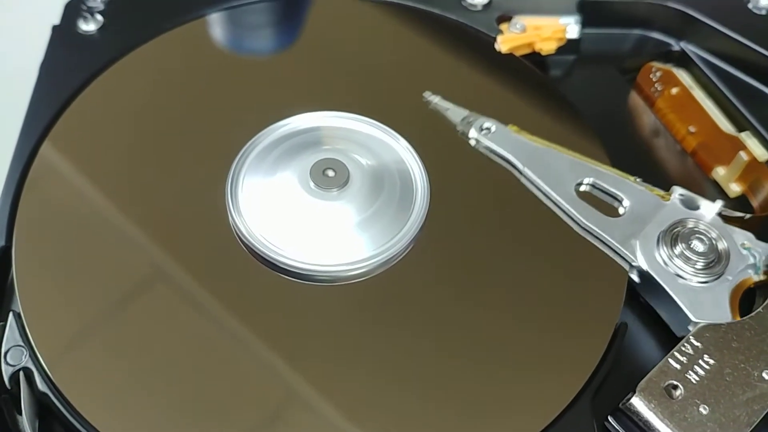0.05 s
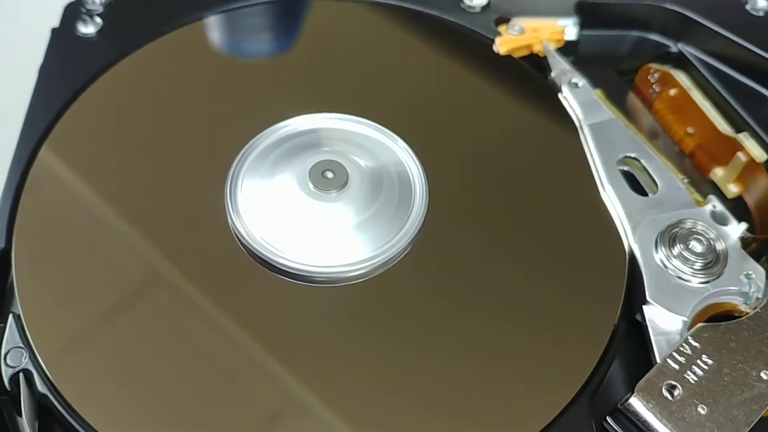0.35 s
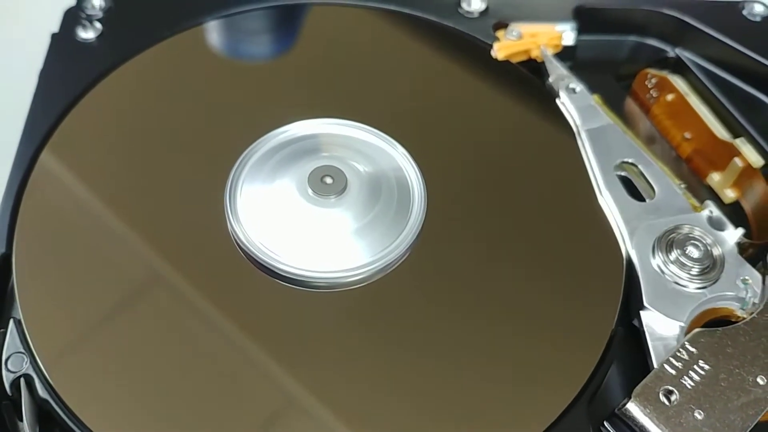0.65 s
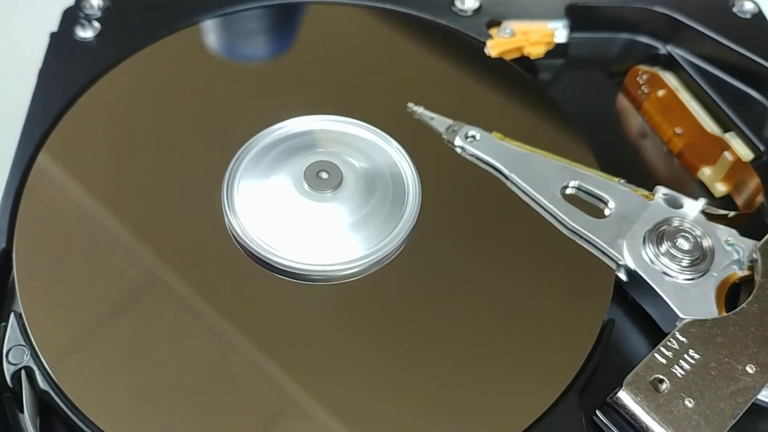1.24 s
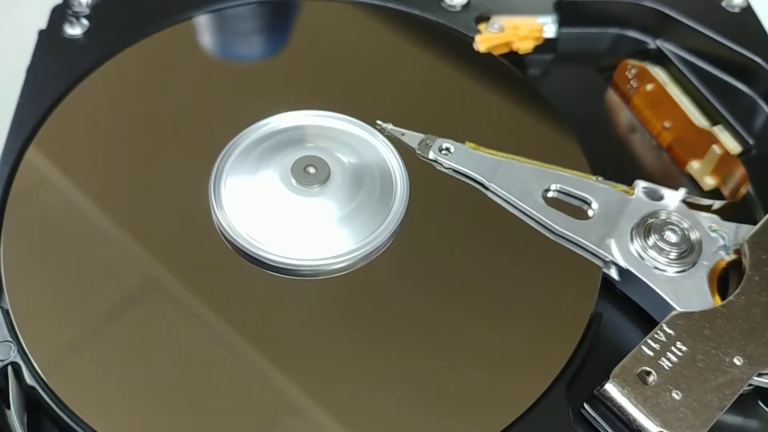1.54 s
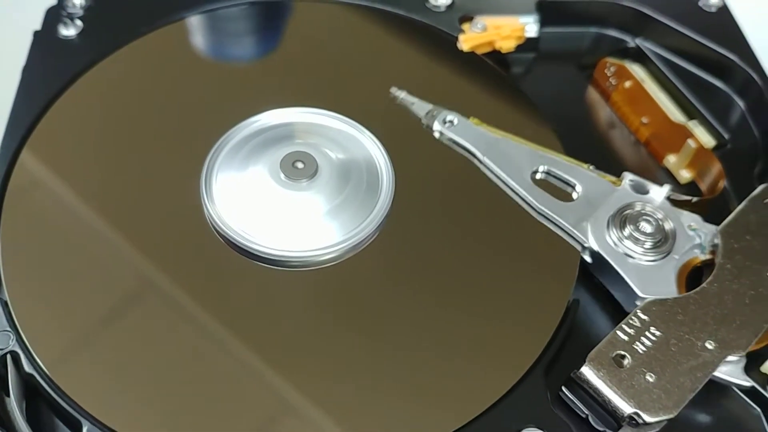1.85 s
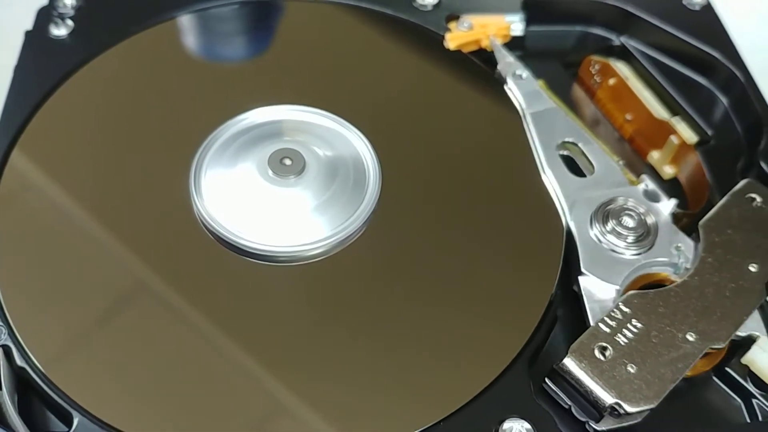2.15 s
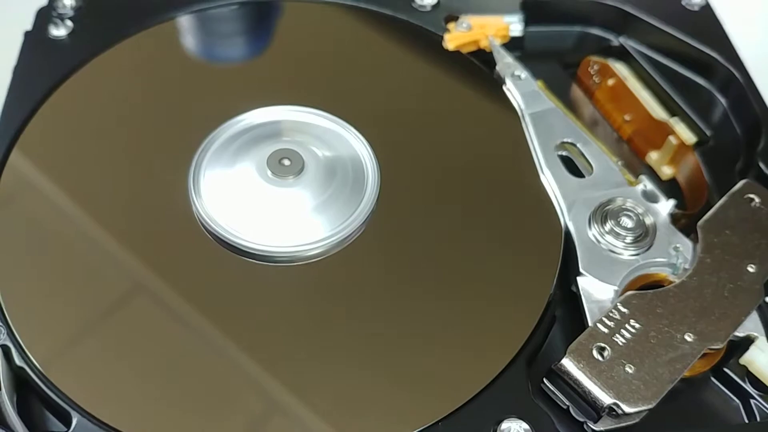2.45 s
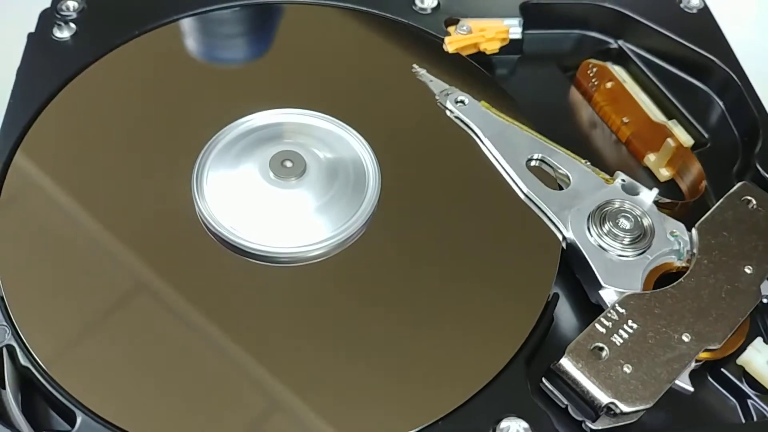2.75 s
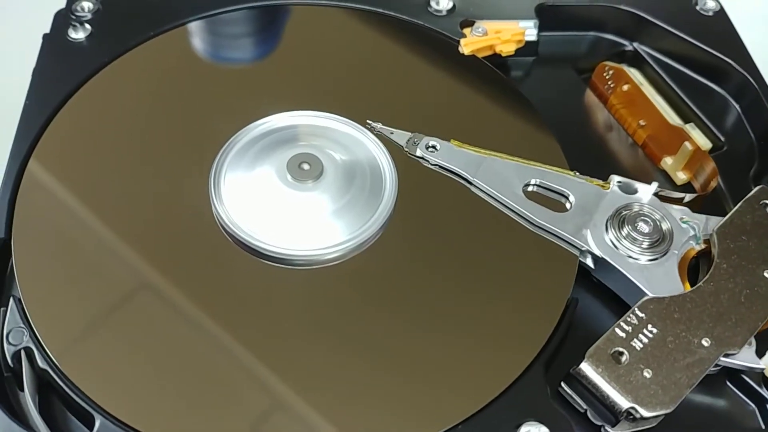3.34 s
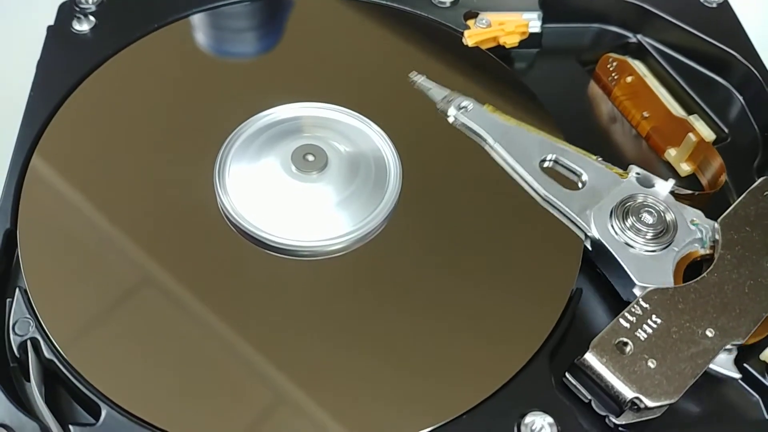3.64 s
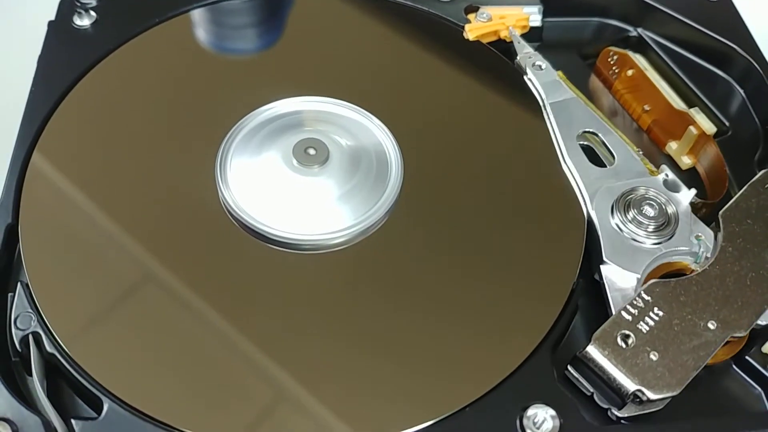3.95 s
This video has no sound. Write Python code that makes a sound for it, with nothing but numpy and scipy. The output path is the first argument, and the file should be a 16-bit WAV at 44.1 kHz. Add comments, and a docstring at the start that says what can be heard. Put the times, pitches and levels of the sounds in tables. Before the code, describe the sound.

A failing hard drive clicks sharply as its arm knocks back and forth in repeating cycles, twice buzzing briefly. Underneath, the spinning disks whirr and hum steadily, very close to the microphone indoors.

```python
"""The clicking arm of a failing hard drive, open on a desk, very close to a stereo pair of microphones.
Hunting for its tracks, the arm clicks three times a cycle: against the inner stop, into the parking
ramp, and off it again. It buzzes while parked, and the heads squeak thinly as they land.
Behind it the casing rumbles, the spindle hums and the air round the platters whirrs,
swelling a little while the arm stands in the air stream."""
import sys
import numpy as np
from scipy import signal
from scipy.fft import rfft, irfft, next_fast_len
from scipy.io import wavfile
from scipy.ndimage import map_coordinates

SR = 44100
rng = np.random.default_rng(int(sys.argv[2]) if len(sys.argv) > 2 else 0)


def master(y):
    """Save y as 16-bit WAV."""
    cut = np.clip(np.atleast_2d(y).T, -1, 1)
    pcm = np.round(cut * 32767)  # scale
    wavfile.write(sys.argv[1], SR, pcm.astype(np.int16))


N = 176400


def amp(db):
    """Decibels to gain."""
    return 10 ** (np.asarray(db) / 20)


def along(points, hz):
    """Each column of a table, read on a log frequency axis."""
    row_hz, *columns = np.transpose(points)
    return np.array([np.interp(np.log(hz + 1), np.log(row_hz + 1), column) for column in columns])


def wobble(knots_per_s):
    """A smooth random curve."""
    knots = rng.standard_normal(int(N * knots_per_s / SR) + 4)
    return map_coordinates(knots, [np.arange(N) * knots_per_s / SR])


def filtered(x, response):
    """Shape x by a response, given as a function of frequency."""
    size = next_fast_len(N + 8192)
    return irfft(rfft(x, size) * response(np.fft.rfftfreq(size, 1 / SR)), size)[..., :N]


def since(start):
    """Seconds since start, zero before."""
    return np.maximum(np.arange(N) / SR - start, 0)


def fall(t, attack_s, t60):
    """A quick rise and an exponential decay."""
    return (1 - np.exp(-t / attack_s)) * amp(-60 * np.minimum(t / t60, 2))


def add(out, start, sound):
    """Mix a short sound in at start seconds."""
    part = out[:, max(round(start * SR), 0):][:, :sound.shape[1]]
    part += sound[:, :part.shape[1]]


def ring(modes, attack_s):
    """One blow; neighbouring modes start opposed, so that close pairs swell and beat."""
    t = np.arange(SR // 4) / SR
    out = np.zeros((2, len(t)))
    for k, (hz, left_db, right_db, t60) in enumerate(modes):
        gain = amp(np.array([[left_db], [right_db]]) + .8 * rng.standard_normal())
        out += (-1) ** k * gain * np.sin(2 * np.pi * hz * t) * fall(t, attack_s, t60)
    return out


# How alike noise is at the two microphones. Each row: frequency in Hz, correlation from 0 to 1.
MIC_LIKENESS = [(100, 1), (300, 1), (600, 0.91), (1500, 0), (3000, 0.44), (7000, 0.29), (14000, 0)]

def stereo_noise(spectrum):
    """Noise of rms 1 with its own colour at each microphone."""
    def mid_side_gains(hz):
        angle = np.arccos(np.clip(along(MIC_LIKENESS, hz)[0], -1, 1)) / 2
        return np.array([np.cos(angle), np.sin(angle)])
    mid, side = filtered(rng.standard_normal((2, N)), mid_side_gains)
    left_right = np.array([mid + side, mid - side])
    return unit(filtered(left_right, lambda hz: amp(along(spectrum, hz))))


def unit(x):
    """Scale to rms 1."""
    return x / np.sqrt(np.mean(x ** 2) + 1e-20)


def room(x):
    """The short answer of the desk and the room around the drive."""
    t = np.arange(SR // 3) / SR
    tail = rng.standard_normal((2, len(t))) * fall(t, attack_s=0.011, t60=0.079)
    return signal.fftconvolve(x, tail / np.linalg.norm(tail[0]), axes=1)[:, :N]


# The casing on the desk. Each row: frequency in Hz, relative level left and right in dB.
RUMBLE_SPECTRUM = [(25, -105, -106), (38, -126, -109), (58.5, -55.5, -50.5), (93, -60, -57),
                   (120, -49, -45), (174.5, -54, -51), (237, -62.5, -59.5), (306, -62, -62),
                   (517, -70.5, -66.5), (940, -114, -118.5)]

def casing_rumble(level_db=-44.5):
    """The casing shakes on the desk: a low rumble whose level wavers."""
    return amp(level_db + 1.15 * wobble(9.03)) * stereo_noise(RUMBLE_SPECTRUM)


def spindle_hum(centre_hz=119.4, width_hz=13.5, level_db=-47, left_db=-1.5):
    """The spindle turns with a rough hum, a little weaker at the left microphone."""
    hum = filtered(rng.standard_normal(N), lambda hz: np.exp(-((hz - centre_hz) / width_hz) ** 2))
    return amp(level_db) * unit(hum) * amp([[left_db], [0]])


# The air round the platters. Each row: frequency in Hz, relative level left and right in dB.
WHIRR_SPECTRUM = [(1010, -86, -82.5), (1225, -102, -77.5), (1264, -74.5, -84), (1710, -131, -73.5),
                  (1912, -69.5, -61.5), (2007, -69, -71), (2405, -71, -101), (2922, -64.5, -64),
                  (3290, -68, -72), (3420, -67, -70.0), (3970, -89.5, -65), (4150, -73, -79.5),
                  (4650, -79, -72), (6260, -83, -76), (6310, -73.5, -69), (6800, -82.5, -71.5),
                  (7560, -86.5, -67), (8100, -85.5, -79.0), (8800, -113.0, -89.5), (9400, -144.0, -102.0),
                  (10600, -136.0, -144.0), (11400, -115.0, -107.0), (14700, -111.0, -96.5),
                  (15700, -118.0, -108.0)]
# The arm stands in the air stream. Each row: start and end in seconds.
ARM_IN_STREAM = [(-.5, 0.32), (.97, 2.07), (2.76, 3.78)]

def air_whirr(level_db=-36, swell_db=1.5, swell_s=0.053):
    """The platters drag air round in a flickering hiss that swells while the arm stands over them."""
    t = since(0)
    in_stream = sum(np.tanh((t - start) / swell_s) - np.tanh((t - end) / swell_s)
                    for start, end in ARM_IN_STREAM) / 2
    flicker_db = 0.92 * wobble(25.44) + 0.18 * wobble(20)
    return amp(level_db + swell_db * in_stream + flicker_db) * stereo_noise(WHIRR_SPECTRUM)


# The heads land on the platter. Each row: time of the peak in seconds, level in dB.
HEAD_LANDINGS = [(.848, -58), (2.635, -64)]

def head_squeaks(centre_hz=14450, width_hz=420, width_s=.03):
    """Narrow, very high friction noise as the heads settle."""
    friction = filtered(rng.standard_normal((2, N)),
                        lambda hz: 1 / (1 + ((hz - centre_hz) / width_hz) ** 2))
    envelope = sum(amp(db) * np.exp(-((since(0) - peak) / width_s) ** 2) for peak, db in HEAD_LANDINGS)
    return unit(friction) * envelope


# The arm's modes. Each row: frequency in Hz, relative level left and right in dB, t60 in seconds.
ARM_MODES = [(1447.6, -5, 4, 0.082), (1550, -2.5, 6.5, 0.075), (2870, -13, -11, 0.05),
             (3462, 2, -17, 0.051), (3570, -1.5, -6, 0.096), (3790, -17, -3.5, 0.041),
             (4510, -5.5, -6.5, 0.043), (5170, -10.5, -12, .03), (6340, -20, -5, 0.049),
             (7450, -27, -19, 0.03)]

def arm_ring(attack_s):
    """The struck arm rings, its close modes beating."""
    return ring(ARM_MODES, attack_s)


# The arm buzzes against the ramp. Each row: start in seconds, length in seconds, tap level in dB.
ARM_BUZZES = [(0.481, 0.069, -41.5), (2.283, 0.066, -44.5)]

def arm_buzzes(step_hz=111.15, scatter_db=3):
    """The parked arm is nudged in small even steps, which keep its modes ringing."""
    out = np.zeros((2, N))
    for start, length, db in ARM_BUZZES:
        tap = arm_ring(attack_s=0.0025)
        tap_levels = db + scatter_db * rng.standard_normal(32)
        for offset, tap_db in zip(np.arange(0, length, 1 / step_hz), tap_levels):
            add(out, start + offset, amp(tap_db) * tap)
    return out


# Modes of the ramp and of the head springs.
# Each row: frequency in Hz, relative level left and right in dB, t60 in seconds.
RAMP_MODES = [(2363, -4, -2.5, 0.063), (3100, -10, -4.5, 0.066), (3414, -2, -6, 0.044),
              (3813, -8, 3, 0.068), (5116, 2, 12.5, 0.047), (5220, -5, -3, 0.027), (7550, -15, -4.5, .035),
              (8020, -19, -3, 0.032)]
SPRING_MODES = [(1240, -7, -4, 0.045), (1540, -9, 2, 0.033), (1840, 8, -4, .06), (2344, 3, -2, 0.071),
                (2810, -3, -5, .03), (3460, 3, 1, 0.061)]
# Contact noise at the ramp. Each row: frequency in Hz, relative level left and right in dB.
RAMP_CRACK_SPECTRUM = [(310, -7, 0.5), (870, -10, -8), (1310, -4, 3.5), (2650, 6.5, 3), (3700, 5, 3.5),
                       (4800, -4, -3), (5350, 7, 6), (6100, -15, 0.5), (7700, -6, 6.5), (10000, -35, -15),
                       (15000, -28.5, -19)]
# The arm meets the ramp, rebounds and later slips off it.
# Each row: start in seconds, then ring, crack and clatter levels in dB.
RAMP_TOUCHES = [(0.3733, -27.5, -25.5, -41), (0.3794, -28, -29.5, -38), (0.801, -38, -39.5, -45),
                (2.1706, -30, -26, -33), (2.1765, -33, -30, -28.5), (2.5765, -39, -41, -47),
                (3.9141, -27.5, -24, -37), (3.92, -30.5, -29, -39)]

def ramp_snaps():
    """Each touch of the parking ramp is a dry snap that rings it and rattles the head springs."""
    out = np.zeros((2, N))
    crack = stereo_noise(RAMP_CRACK_SPECTRUM)
    for start, ring_db, crack_db, clatter_db in RAMP_TOUCHES:
        add(out, start, amp(ring_db) * ring(RAMP_MODES, attack_s=0.00068))
        add(out, start, amp(clatter_db) * ring(SPRING_MODES, attack_s=0.001))
        out += amp(crack_db) * crack * fall(since(start), attack_s=0.00031, t60=0.036)
    return out


# Contact noise of the arm. Each row: frequency in Hz, relative level left and right in dB.
ARM_CRACK_SPECTRUM = [(303, -5, 0), (940, -14, -2.5), (1410, 1, 12.5), (1970, -25, 15.5), (2850, 16.5, -25),
                      (4600, 0, 9), (6460, -2, 8), (8440, -16, 2), (9250, -42, -20), (14600, -39, -45)]
# Blows on the arm, right by the microphones. Each row: start in seconds, ring and crack levels in dB.
ARM_BLOWS = [(.0012, -23, -24.5), (.7885, -29.5, -28), (.7995, -32.5, -25), (1.458, -40.5, -44),
             (1.7917, -22, -25), (2.565, -31, -29.5), (2.5758, -31, -27), (3.3004, -40.5, -47),
             (3.5668, -21, -23.5)]

def arm_knocks():
    """The arm hits its inner stop, jerks off the ramp or ticks on its way: a crack, then a round ring."""
    out = np.zeros((2, N))
    crack = stereo_noise(ARM_CRACK_SPECTRUM)
    for start, ring_db, crack_db in ARM_BLOWS:
        add(out, start, amp(ring_db) * arm_ring(attack_s=0.0016))
        out += amp(crack_db) * crack * fall(since(start), attack_s=0.00057, t60=0.038)
    return out


def scene(room_db=-14.5, left_lag_s=0.000284):
    """The drive lies a little nearer the right microphone, so its sound reaches the left one later."""
    arm = arm_knocks() + ramp_snaps() + arm_buzzes() + head_squeaks()
    background = air_whirr() + spindle_hum() + casing_rumble()
    drive = background + arm + amp(room_db) * room(arm)
    return filtered(drive, lambda hz: np.exp(-2j * np.pi * hz * np.array([[left_lag_s], [0]])))


def record(dry):
    """The recorder keeps nothing above its band limit."""
    return filtered(dry, lambda hz: hz < 15850)


dry = scene()
out = record(dry)
master(out)
```